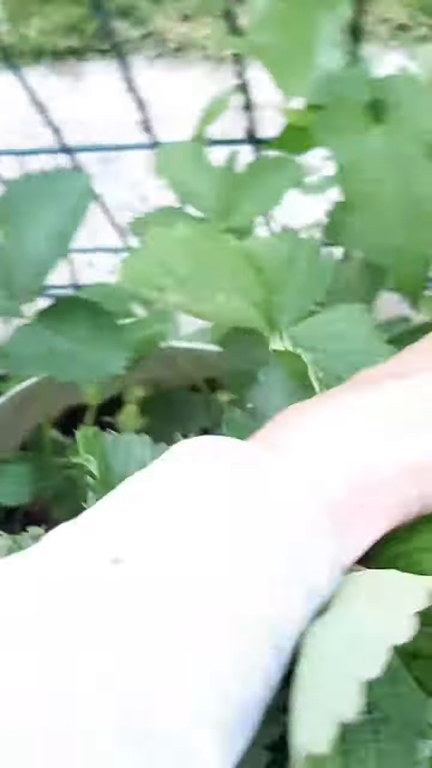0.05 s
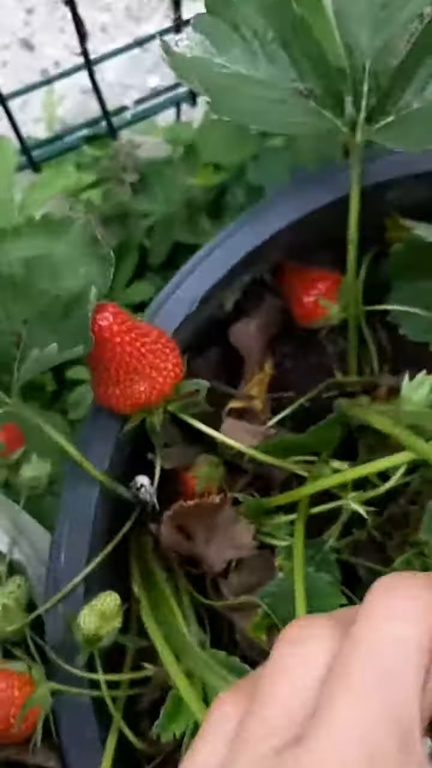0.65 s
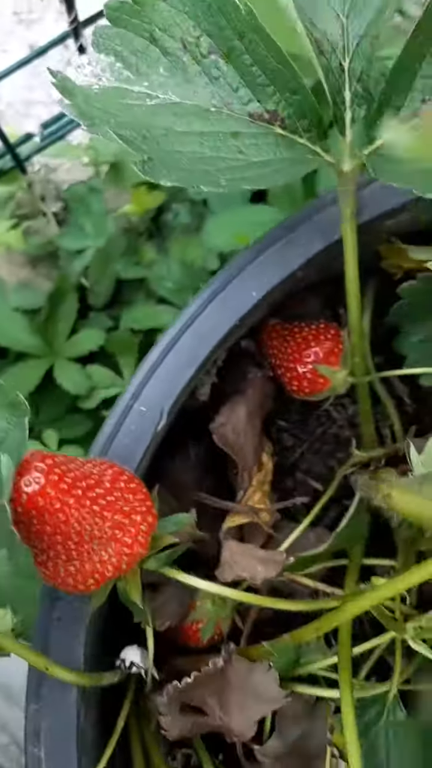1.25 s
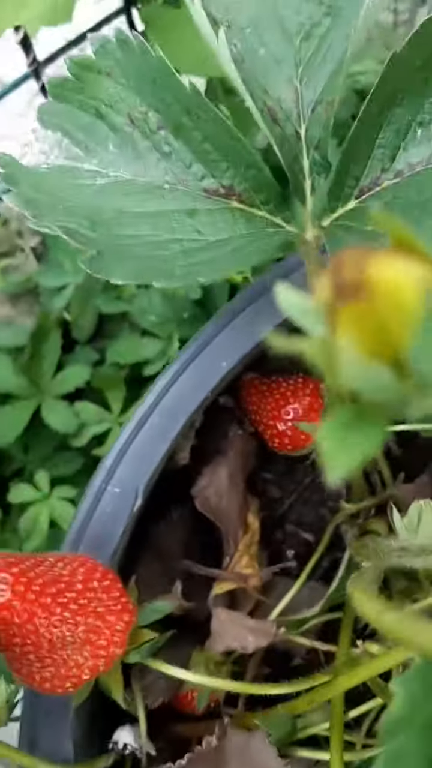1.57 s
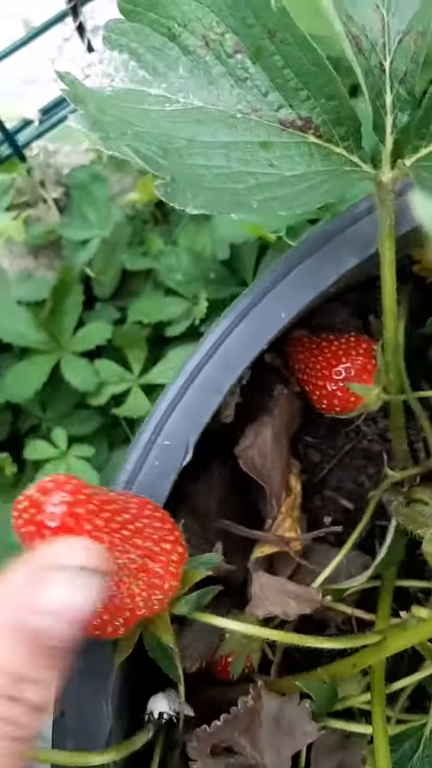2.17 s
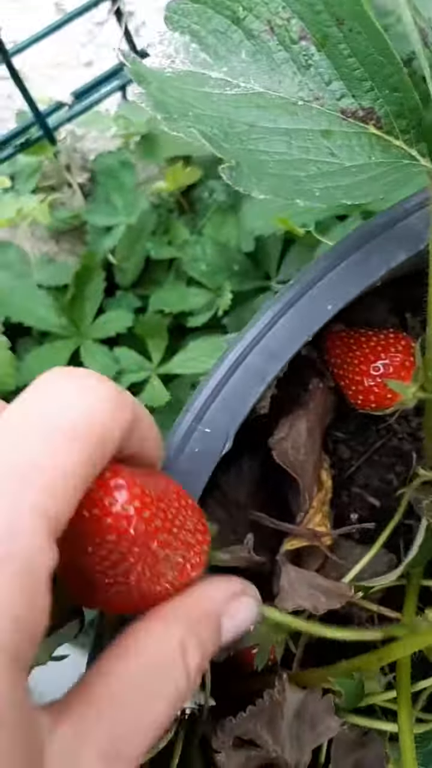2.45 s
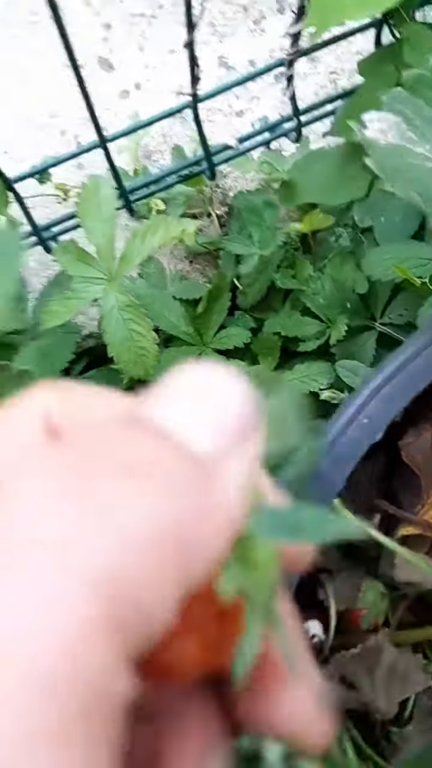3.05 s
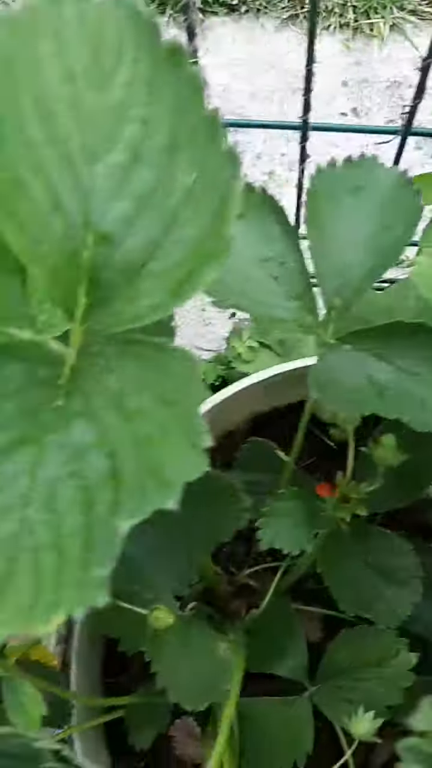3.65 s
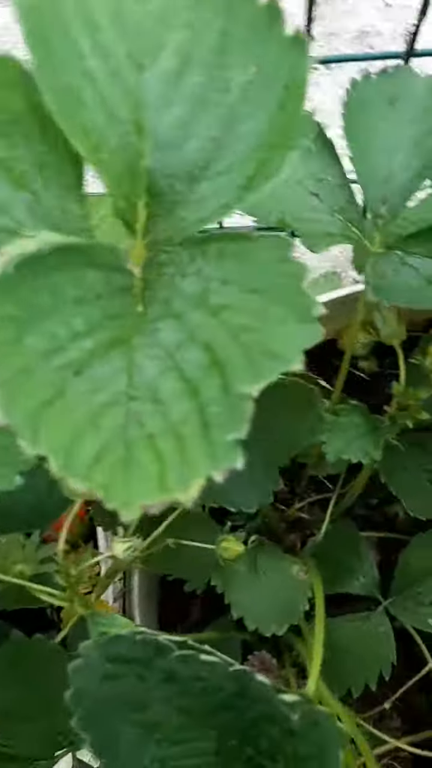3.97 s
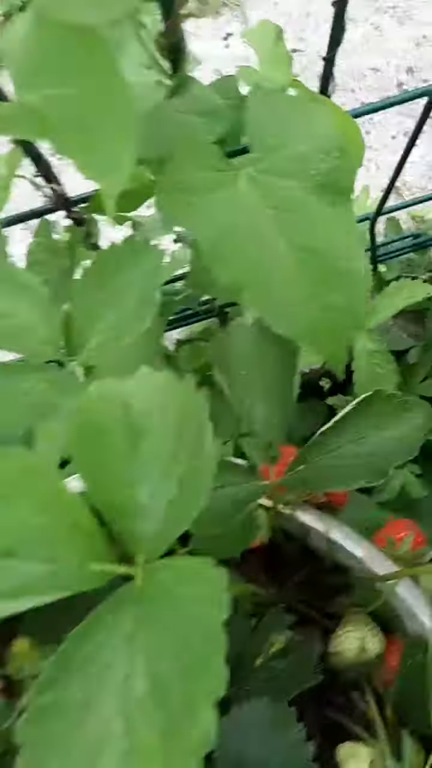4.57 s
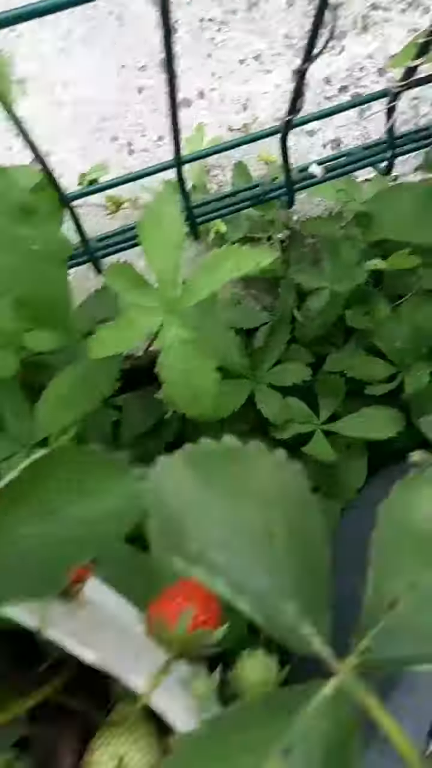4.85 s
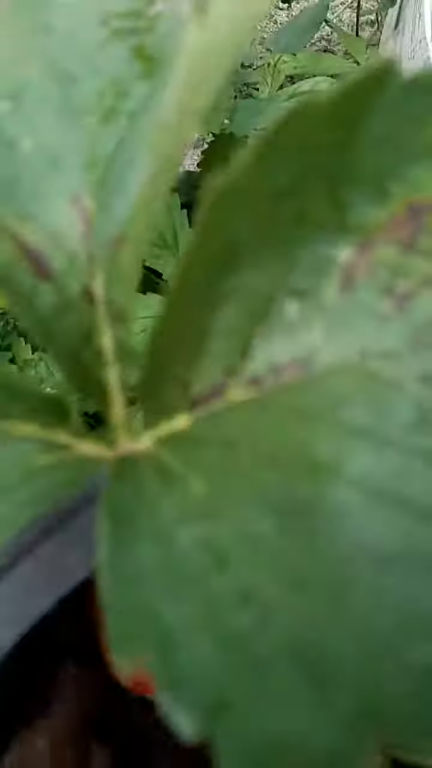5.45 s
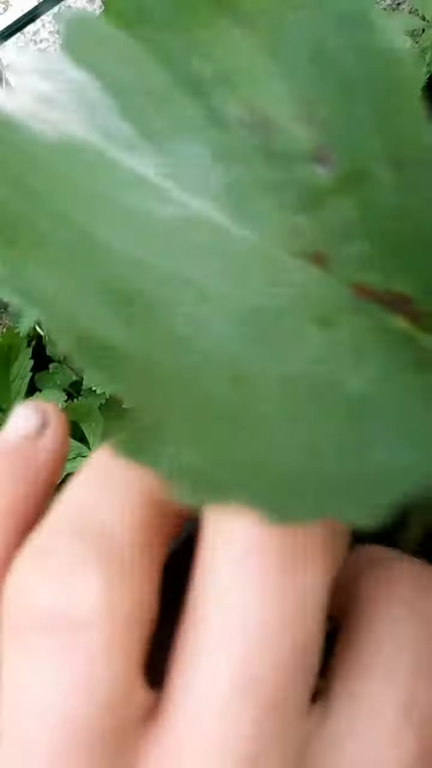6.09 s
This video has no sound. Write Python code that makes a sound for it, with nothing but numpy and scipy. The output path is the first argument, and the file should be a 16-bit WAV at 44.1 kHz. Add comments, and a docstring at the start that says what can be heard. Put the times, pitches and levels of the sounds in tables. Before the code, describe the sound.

In a quiet garden, leaves slide, catch and crackle very close to the microphone as hands pick fruit from a plant. Sharp little stalk snaps break through the jerky rustling, along with dull scuffs where foliage drags over the microphone. After a short lull past the middle, the plastic pot takes a few soft knocks and the rustling returns. A sparrow gives occasional short chirps in the background.

```python
"""Leaves rustle and crackle as hands pick fruit from a potted strawberry plant, a hand's width from
two microphones. The hairy leaves slide, catch and slip, and some drag right over a microphone housing.
Stalks snap as their fibres tear, and soft bumps sound the wall of the plastic pot.
Behind it lies the hush of a quiet garden, where a sparrow chirps now and then."""
import sys
import numpy as np
from scipy import signal
from scipy.io import wavfile
from scipy.ndimage import uniform_filter1d

SR = 44100
rng = np.random.default_rng(int(sys.argv[2]) if len(sys.argv) > 2 else 0)


def wrap_up_sound(samples):
    """Save the sound to the file named by the first command line argument, as 16-bit audio."""
    columns = np.atleast_2d(samples).T
    # keep every value between -1 and 1, then stretch to whole-number steps
    tamed = np.clip(columns, -1, 1)
    steps = np.round(tamed * 32767).astype(np.int16)
    wavfile.write(sys.argv[1], SR, steps)


N = 278709
TIME = np.arange(N) / SR
BAND_LIMIT_HZ = 16100

# dull scuff of plastic, on the microphone housing and the pot: (frequency [Hz], level [dB])
PLASTIC_SCUFF = [(20, -27), (60, -8), (130, -2.5), (270, 2), (500, -4.5), (1000, -6), (2000, -25),
                 (6000, -42)]


def amp(db):
    """Decibels to gain."""
    return 10 ** (np.asarray(db) / 20)


def unit(x):
    """Scales each row to rms 1."""
    return x / np.sqrt(np.mean(x ** 2, axis=-1, keepdims=True) + 1e-20)


def add(mix, start_s, sound):
    """Mixes a stereo sound in at its start time."""
    part = mix[:, max(round(start_s * SR), 0):][:, :sound.shape[1]]
    part += sound[:, :part.shape[1]]


def sides(pan_db):
    """Microphone gains of constant total power; pan_db is left minus right."""
    gains = amp(np.array([np.atleast_1d(pan_db), -np.atleast_1d(pan_db)]) / 2)
    return gains / np.sqrt(np.mean(gains ** 2, axis=0))


def colour(x, spectrum, size=4096):
    """Minimum-phase filter through the (Hz, dB) points of a spectrum."""
    hz, db = np.transpose(spectrum)
    bin_hz = abs(np.fft.fftfreq(size, 1 / SR)) + 1
    log_gain = np.log(amp(np.interp(np.log(bin_hz), np.log(hz), db)))
    taps = np.fft.ifft(np.exp(np.conj(signal.hilbert(log_gain)))).real[:size // 2]
    return signal.oaconvolve(x, taps)[:len(x)]


def wander(per_s):
    """Random curve of rms 1 that glides to a new value per_s times a second."""
    return unit(np.interp(TIME * per_s, np.arange(4096), rng.standard_normal(4096)))


def swell(start, rise, hold, release_db_per_s):
    """Gain of one contact: it rises, holds and dies away."""
    age = TIME - start
    attack = np.clip(age / max(rise, 1 / SR), 0, 1)
    return attack * amp(-release_db_per_s * np.maximum(age - rise - hold, 0))


def crackle(per_s, spread_db, ring_s, patches=28, size=400):
    """Hairs and edges catch and slip; each patch of leaf rings briefly and is touched on and off."""
    t, out = np.arange(size) / SR, np.zeros((2, N))
    for _ in range(patches):
        ring = unit(rng.standard_normal((2, size)) * np.exp(-t / (ring_s * rng.uniform(0.2, 2.8))))
        slips = rng.random(N) < per_s / patches / SR * amp(5 * wander(45))
        force = amp(spread_db * np.minimum(rng.exponential(1, N), 4))
        out += signal.oaconvolve((slips * force)[None], ring, axes=1)[:, :N]
    return unit(out)


def garden_air(level_db=-65, pan_db=-5):
    """The faint steady hush of the garden, all round the microphones."""
    # colour of the outdoor air: (frequency [Hz], level [dB])
    spectrum = [(15, -35), (25, -9), (38, 0), (108, 6.5), (326, -13.5), (863, -25), (1190, -7), (2550, 0.5),
                (3250, -30), (6380, -19), (8590, -36), (11900, -25.5), (16000, -34)]
    hush = unit(np.array([colour(noise, spectrum) for noise in rng.standard_normal((2, N))]))
    return hush * amp(level_db) * sides(pan_db)


def sparrow(gain_db=-1, pan_db=-2, arch=0.254, waver=0.048, centre_hz=4100, echo_db=-8, echo_t60=0.15):
    """Short whistled notes, each arching and wavering in pitch; garden walls return a thin echo."""
    # chirps, some cut short: (time [s], level [dB], length [s], treble emphasis [dB per octave])
    calls = [(1.157, -24, .08, 2), (2.259, -22.5, .08, 4.5), (3.378, -21, .05, -2),
             (4.714, -21.5, .05, -16), (5.185, -23.5, .05, -22), (5.866, -23, .08, -1)]
    # the falling run of notes in a chirp: (offset [s], length [s], top pitch [Hz], level [dB])
    notes = [(.007, 0.0108, 5810, -12), (.018, 0.013, 4890, -6.5), (0.03, 0.013, 4310, -8.5),
             (.042, .01, 4150, -6.5), (.052, 0.013, 3370, -4.5)]
    out = np.zeros((2, N))
    for start, call_db, call_length, tilt_db in calls:
        for offset, length, top_hz, note_db in notes:
            if offset < call_length:
                position = np.linspace(-1, 1, round(length * SR))
                arch_hz = top_hz * (1 - arch * (top_hz / centre_hz - .5) * position ** 2)
                wobble = unit(uniform_filter1d(rng.standard_normal(SR), size=40))[:len(position)]
                hz = arch_hz * (1 + waver * wobble)
                note = np.sin(2 * np.pi * np.cumsum(hz) / SR) * np.cos(np.pi * position / 2)
                level_db = call_db + note_db + gain_db + tilt_db * np.log2(top_hz / centre_hz)
                add(out, start + offset, note * amp(level_db) * sides(pan_db))
    t = TIME[:SR // 2]
    walls = rng.standard_normal((2, len(t))) * amp(-60 * t / echo_t60)
    echo = signal.oaconvolve(out, walls / np.linalg.norm(walls[0]), axes=1)[:, :N]
    return out + amp(echo_db) * echo


def pot_bumps(gain_db=-2, rise_s=0.0019, upper_db=-14, upper_ratio=1.89, soil_db=-24, soil_t60=.12):
    """A soft blow swells over a few milliseconds; the soil damps the pot wall at once."""
    # knocks on the pot: (time [s], level [dB], left-right [dB], pitch [Hz], t60 [s])
    blows = [(3.590, -36, -12, 322, 0.023), (4.033, -32.5, -4.5, 272, 0.027), (4.075, -47, -7, 210, 0.02),
             (4.2214, -21.5, -5.5, 282, 0.019), (4.2853, -29, -8, 260, 0.015),
             (4.349, -33.5, -2, 282, 0.028), (5.515, -25.5, -7, 773, 0.041), (6.162, -24.5, 11, 567, 0.007),
             (6.202, -37.5, 10, 500, .02)]
    t, out = np.arange(6000) / SR, np.zeros((2, N))
    for start, level_db, pan_db, hz, t60 in blows:
        wall = np.sin(2 * np.pi * hz * t) + amp(upper_db) * np.sin(2 * np.pi * hz * upper_ratio * t)
        soil = unit(colour(rng.standard_normal(len(t)), PLASTIC_SCUFF))
        soil *= amp(soil_db - 60 * t / soil_t60)
        bump = wall * amp(-60 * t / t60) * (1 - np.exp(-(t / rise_s) ** 2))
        add(out, start, (bump / abs(bump).max() + soil) * amp(level_db + gain_db) * sides(pan_db))
    return out


def microphone_brushes(flutter_db=1.0, rumble_hz=(70, 170), release_db_per_s=263):
    """A leaf dragged over the housing scuffs in that microphone; a soft, heavy contact only rumbles."""
    # leaves on the housing: (time [s], rise [s], hold [s], level [dB], left-right [dB], softness [0-1])
    drags = [(0.649, .02, 0.084, -41, -37, 0), (0.734, 0.022, 0.11, -35.5, -33.5, .1),
             (0.897, .02, 0.091, -49.5, -25, 0.18), (1.119, 0.0089, 0.022, -38, 21, 0.67),
             (1.194, .01, 0.054, -45, 15, 1), (1.869, 0.018, 0.02, -45, -23, .4),
             (2.769, 0.021, 0.067, -48, -11, 0.07), (5.06, .015, 0.035, -44, -17, .31)]
    slips = crackle(per_s=870, spread_db=4.5, ring_s=0.00091, patches=10)
    scuff = unit(np.array([colour(side, PLASTIC_SCUFF) for side in slips]))
    rumble_band = signal.butter(2, rumble_hz, "band", fs=SR, output="sos")
    rumble = unit(signal.sosfilt(rumble_band, rng.standard_normal((2, N))))
    out = np.zeros((2, N))
    for start, rise, hold, level_db, pan_db, softness in drags:
        contact = np.sqrt(softness) * rumble + np.sqrt(1 - softness) * scuff
        out += contact * swell(start, rise, hold, release_db_per_s) * amp(level_db) * sides(pan_db)
    return out * amp(-flutter_db * wander(60))


def stalk_snaps(gain_db=-1, ring_db=11, force_slope=0.32, thin_hz=4800, upper_db=-8, upper_ratio=1.75,
                max_lag_s=0.000451, rise_s=0.00078, scatter_db=-24, scatter_t60=0.072):
    """Fibres tear in a burst; a stiff stalk rings in two damped modes; foliage scatters a faint tail."""
    # stalks breaking, leaf edges flicking free: (time [s], level [dB], left-right [dB], ring [Hz], t60 [s])
    breaks = [(.193, -14, -1, 3100, .007), (.381, -17, 1, 3380, 0.0089), (.604, -25, -2, 6500, .012),
              (.859, -16, -7, 13100, 0.0044), (.994, -8.5, -12.5, 5520, 0.015),
              (1.124, -6.5, 11, 3724, 0.016), (1.145, -13.5, 7, 5440, .008), (1.613, -16, -13, 7000, 0.021),
              (1.623, -19, -5, 3800, 0.014), (1.977, -20, -7, 2640, 0.008),
              (2.030, -18.5, -4.5, 3760, 0.02), (2.179, -25.5, -14, 7000, .008),
              (2.213, -22, -18, 2210, 0.0053), (2.623, -28.5, -9, 2990, 0.043),
              (2.779, -20.5, -16, 3890, 0.019), (2.8231, -8, -16, 4230, 0.0083),
              (2.9735, -3, -3.5, 2620, 0.0076), (3.331, -10, -17, 2700, 0.017),
              (3.481, -26, -8, 6740, 0.024), (3.561, -27.5, -10, 2960, 0.023),
              (3.693, -38, -15, 2940, 0.022), (4.032, -41, -9, 2840, 0.037), (4.212, -34, -16, 2420, 0.054),
              (4.368, -26, -17, 2970, .02), (4.46, -25, 1, 3430, 0.029), (5.118, -14, -17, 3620, 0.013),
              (5.332, -23.5, -18, 3600, 0.04), (5.746, -21.5, -5, 3530, 0.012),
              (6.088, -19, -16, 5480, 0.011), (6.164, -28, -16, 2940, .011)]
    # the crack of tearing fibres: (frequency [Hz], level [dB])
    spectrum = [(100, -13.5), (1200, -7.5), (2600, 3), (4800, 0.5), (6800, -2), (8500, -10.5),
                (16000, -12.5)]
    t, out = np.arange(3000) / SR, np.zeros((2, N))
    tearing = colour(rng.standard_normal(len(breaks) * 2 * len(t)), spectrum)
    cracks = unit(tearing.reshape(len(breaks), 2, len(t)))
    for (start, level_db, pan_db, hz, t60), crack in zip(breaks, cracks):
        # the ring reaches the farther microphone later
        lag = max_lag_s * np.tanh(pan_db / 5) * np.array([[0], [1]])
        upper_hz = min(hz * upper_ratio, BAND_LIMIT_HZ)
        lower = np.sin(2 * np.pi * (hz * (t - lag) + rng.random()))
        upper = np.sin(2 * np.pi * (upper_hz * t - hz * upper_ratio * lag + rng.random()))
        # thick stalks broken hard ring most; thin edges only tick
        ring_gain = amp(ring_db + force_slope * level_db) / (1 + (hz / thin_hz) ** 8)
        ring = ring_gain * unit(lower + amp(upper_db) * upper)
        tail = crack * amp(scatter_db - 60 * t / scatter_t60)
        snap = (ring + crack) * amp(-60 * t / t60) + tail
        snap *= 1 - np.exp(-(t / rise_s) ** 2)
        snap /= abs(snap).max(axis=1, keepdims=True)
        add(out, start, snap * amp(level_db + gain_db) * sides(pan_db))
    return out


def hand_motion(attack_s=0.019, release_db_per_s=339):
    """Strokes add power to the resting contact; gives microphone gains, brightness [dB] and body [dB]."""
    # leaves resting against the moving hand and arm:
    # (time [s], level [dB], left-right [dB], brightness [dB], body [dB])
    contact = [(0.0, -25.5, -3.5, -10.5, -1.5), (.06, -32.5, -2.5, -2, -0.5), (.35, -36.5, 0.5, 2.5, 2),
               (.51, -40, -2.5, 1.5, 0), (1.27, -42, -5, 8, 2), (1.95, -33.5, -10, -1, -1.5),
               (2.08, -40, -15, -5.5, -3.5), (2.55, -45.5, -2, -0.5, -7.5), (2.75, -43, -11, -0.5, -2),
               (3.44, -41.5, -8, 0, 3.5), (3.62, -52, -4, -5, 1.5), (3.77, -69.5, -8, 4.5, 1),
               (4.0, -64.5, -3.5, 6.5, 0), (4.3, -49.5, -8, 10.5, 13), (4.45, -44.5, -6, -7, 6),
               (4.51, -33.5, 0.5, 0, 4), (5.03, -35, -4, 7, 3.5), (5.3, -39, -8.5, 4.5, -0.5),
               (6.05, -42, -8, 5.5, 3.5), (6.32, -44.5, -10, 2.5, 0)]
    # pushes through the foliage:
    # (time [s], length [s], level [dB], growth [dB], left-right [dB], brightness [dB], body [dB])
    strokes = [(0.152, 0.17, -31, 5.5, 1, -0.5, -0.5), (0.443, 0.033, -41.5, 5, 4, 0, 2),
               (0.563, 0.033, -40.5, -9, 0, 6, -1), (0.725, 0.18, -30, -6, -21, 10.5, 1.5),
               (0.941, 0.049, -35, 5, -10, 10.5, -4), (1.011, .083, -30.5, 4.5, 0.5, -0.5, 1),
               (1.115, 0.096, -31.5, -17, 8, -5, -3.5), (1.337, 0.29, -41.5, 4, -13, 11.5, 2.5),
               (1.6, 0.022, -35, -3, -16, 16, 4), (1.682, 0.043, -37.5, 6, -7, 6, -1),
               (1.793, 0.087, -32.5, 3, -13, 5, -2.5), (2.012, 0.018, -34, 2, -3, -9, -16),
               (2.085, 0.017, -32.5, 3, -12, -6, -6), (2.192, .025, -37, -0.5, -14, -8, 4),
               (2.38, 0.082, -39, 7, -7, -4, -5.5), (2.763, 0.14, -38.5, -4, -8, 2.5, -1),
               (2.908, 0.39, -35.5, 1, -4.5, 4, 1), (3.308, .11, -30.5, -3, -10, 0.5, -3),
               (3.58, 0.052, -45, -4, -8, 1, 11), (3.688, .03, -48.5, -2.5, -4, 1, 1),
               (4.096, .06, -44.5, -2, -6.5, -5.5, -6), (4.233, 0.037, -35.5, -6, -6, 4, 2),
               (4.357, .018, -38.5, 1, -4, -9, 6), (4.534, 0.051, -31, -2, -7, -4, 1.5),
               (4.727, 0.19, -32.5, -11, 2, -3.5, -0.5), (5.06, 0.072, -24, -1.5, -14.5, 4, 0),
               (5.147, 0.11, -35, 1, -10, 6, -3), (5.355, 0.05, -33.5, -4, -10, -3, -2),
               (5.419, 0.14, -32.5, -1.5, -11, 2.5, 0), (5.6, 0.081, -36, -12, -7, -2.5, -8),
               (5.7, .02, -41.5, -10, -15, 5, -10), (5.851, 0.087, -37.5, -10, -2.5, 7, -6.5),
               (5.958, 0.039, -38.5, 4.5, -5, 10, -2), (6.131, .075, -41, -8, -3.5, -3, 8)]
    times, *columns = np.transpose(contact)
    level_db, pan_db, bright_db, body_db = (np.interp(TIME, times, column) for column in columns)
    total = amp(level_db) ** 2
    mic_power, bright, body = total * sides(pan_db) ** 2, total * bright_db, total * body_db
    for start, length, level_db, growth_db, pan_db, bright_db, body_db in strokes:
        progress = np.clip((TIME - start) / length, 0, 1) - .5
        # a stroke catches as the leaves bend and dies away as they spring back
        envelope = swell(start, attack_s, length - attack_s, release_db_per_s)
        push = (envelope * amp(level_db + growth_db * progress)) ** 2
        total += push
        mic_power += push * sides(pan_db) ** 2
        bright += push * bright_db
        body += push * body_db
    return np.sqrt(mic_power), bright / total, body / total


def leaf_rustle(slide_db=-7, jerk_db=0.55, jerks_per_s=90, flicker_db=0.42, resonance_db=2.0,
                treble_shared=0.12, bass_shared=0.24, lag_samples=20, bright_hz=7000, body_hz=1600):
    """Close-up crackle over fine sliding friction, both following the jerky push of the hand."""
    # colour of the leaves at each microphone: (frequency [Hz], level [dB])
    left_colour = [(25, -46), (80, -10.5), (170, -8.5), (500, -7), (1100, -3.5), (1600, -3), (3000, 2),
                   (4300, 2.5), (5600, 0.5), (6400, 2.5), (7700, -10), (11000, -13), (16000, -18)]
    right_colour = [(25, -40), (80, -9), (250, -6.5), (700, -7.5), (1200, -5), (1900, -1), (2700, 3.5),
                    (4400, -0.5), (5800, -6.5), (6800, -4.5), (8300, -15.5), (9500, -12.5), (16000, -17.5)]
    friction = crackle(per_s=2400, spread_db=1.5, ring_s=0.00088)
    friction += amp(slide_db) * rng.standard_normal((2, N))
    # part of the sound reaches the right microphone first and the left one later, most of all in the bass
    paths = np.array([*friction, np.roll(friction[1], lag_samples)])
    hz, frame_s, (left, right, delayed) = signal.stft(paths, SR, nperseg=512, noverlap=384)
    low = 1 / (1 + (hz[:, None] / body_hz) ** 4)
    high = 1 - 1 / (1 + (hz[:, None] / bright_hz) ** 4)
    shared = treble_shared + (bass_shared - treble_shared) * low
    spectra = np.array([shared * delayed + np.sqrt(1 - shared ** 2) * left, right])
    # every new point of contact bends the leaf and shifts its broad resonances
    resonances = rng.standard_normal(spectra.shape) + rng.standard_normal(spectra.shape[1:])
    for _ in range(2):
        resonances = uniform_filter1d(uniform_filter1d(resonances, size=7, axis=1), size=7, axis=2)
    gains, bright_db, body_db = hand_motion()
    # near leaves fizz, broad ones add a papery body
    tone_db = high * np.interp(frame_s, TIME, bright_db) + low * np.interp(frame_s, TIME, body_db)
    spectra *= amp(resonance_db * resonances / resonances.std() + tone_db)
    left, right = signal.istft(spectra, nperseg=512, noverlap=384)[1][:, :N]
    leaves = unit(np.array([colour(left, left_colour), colour(right, right_colour)]))
    unsteady_db = jerk_db * wander(jerks_per_s) + flicker_db * np.array([wander(40), wander(40)])
    return leaves * gains * amp(unsteady_db)


def scene():
    """Plant and pot close to the two microphones, bird and garden air behind."""
    return leaf_rustle() + microphone_brushes() + stalk_snaps() + pot_bumps() + sparrow() + garden_air()


def record(dry):
    """The recorder's band limit: a steep low-pass on both channels."""
    lowpass = signal.firwin(511, BAND_LIMIT_HZ, window=("kaiser", 9), fs=SR)
    return signal.oaconvolve(dry, lowpass[None], "same", axes=1)


dry = scene()
out = record(dry)
wrap_up_sound(out)
```